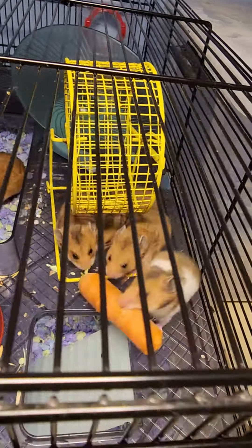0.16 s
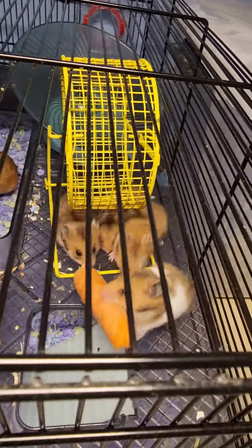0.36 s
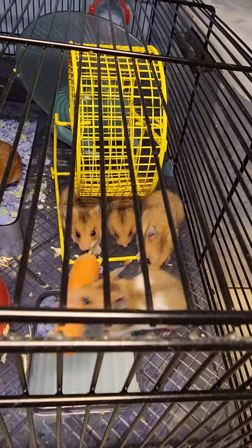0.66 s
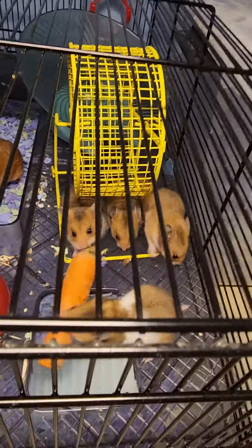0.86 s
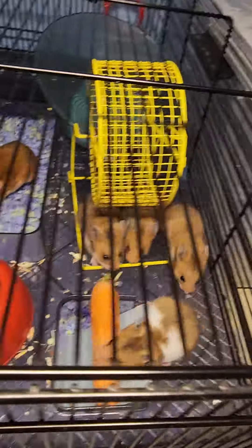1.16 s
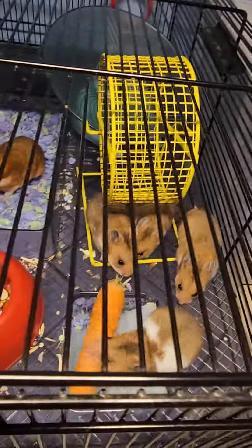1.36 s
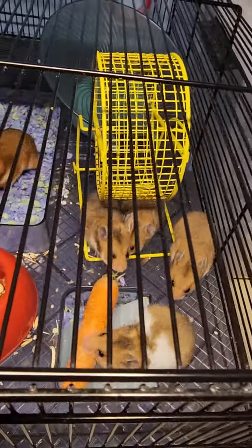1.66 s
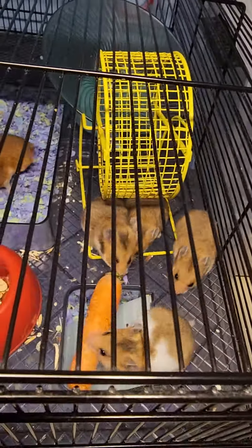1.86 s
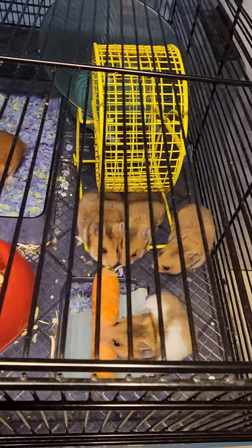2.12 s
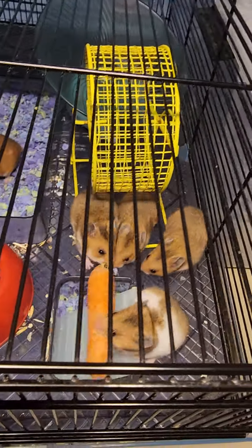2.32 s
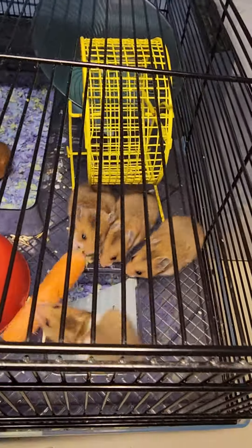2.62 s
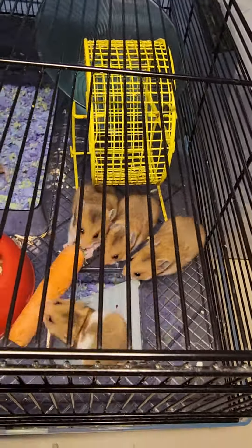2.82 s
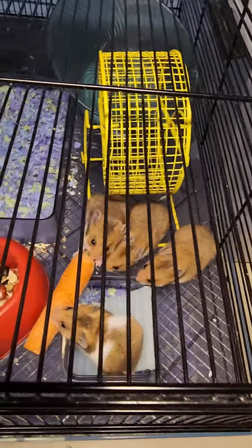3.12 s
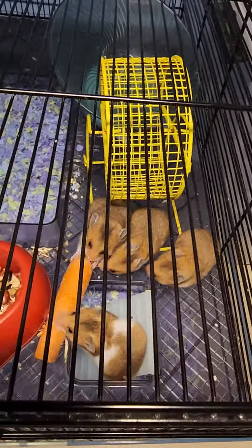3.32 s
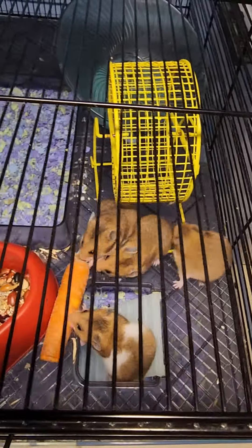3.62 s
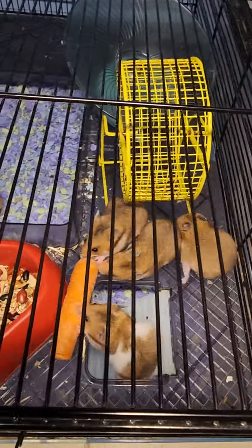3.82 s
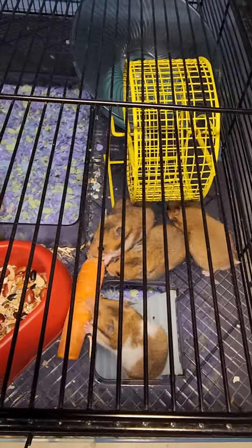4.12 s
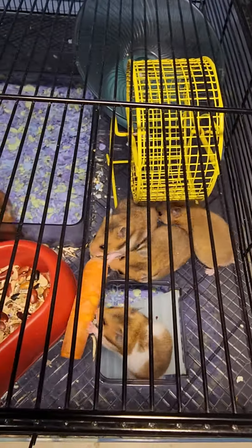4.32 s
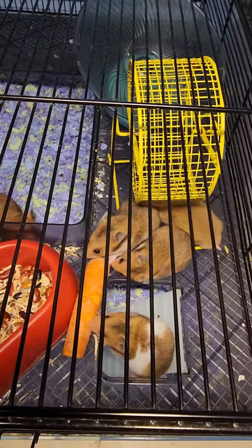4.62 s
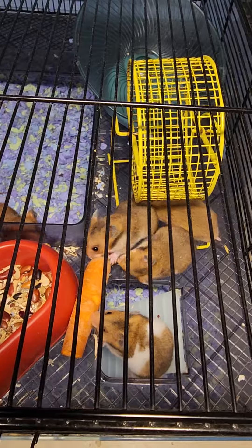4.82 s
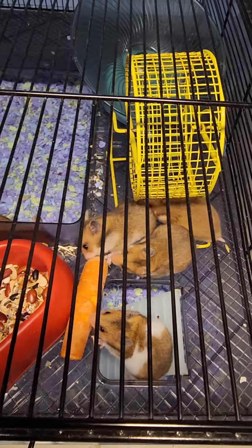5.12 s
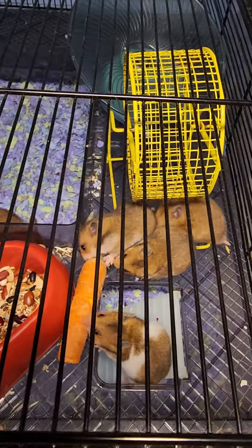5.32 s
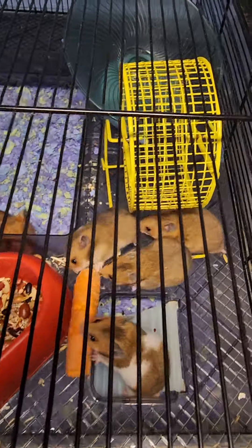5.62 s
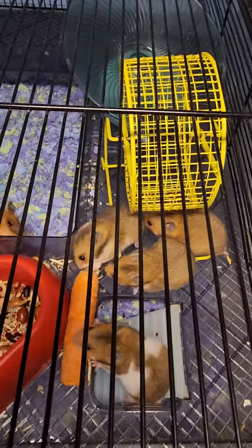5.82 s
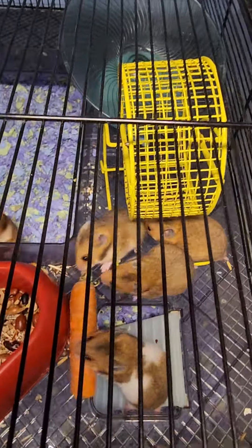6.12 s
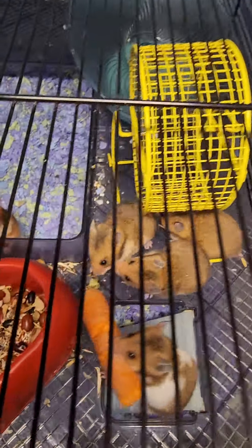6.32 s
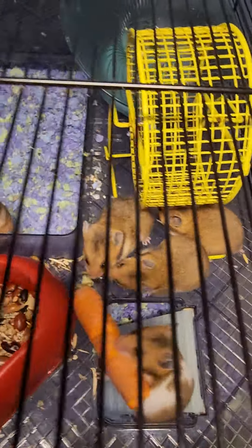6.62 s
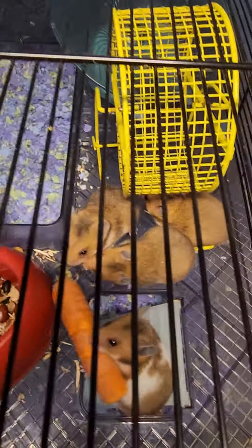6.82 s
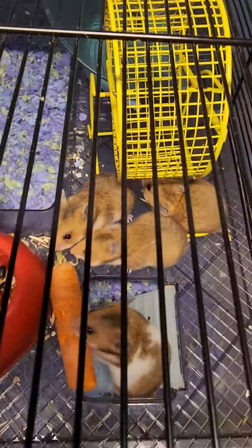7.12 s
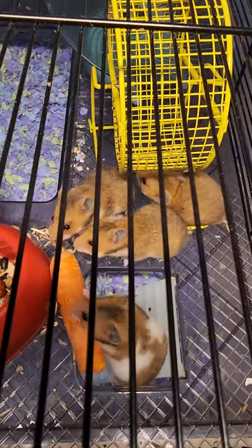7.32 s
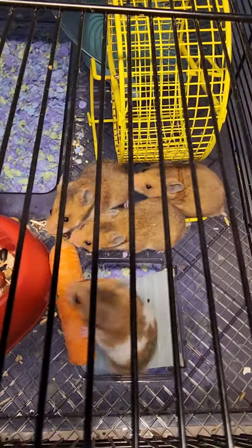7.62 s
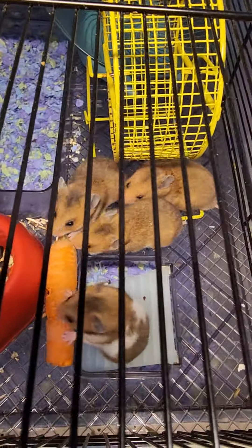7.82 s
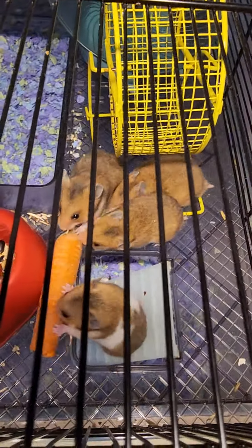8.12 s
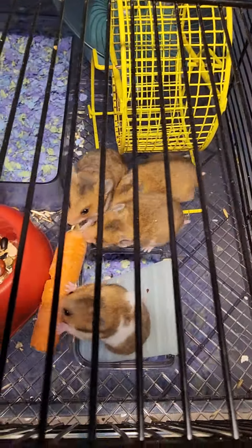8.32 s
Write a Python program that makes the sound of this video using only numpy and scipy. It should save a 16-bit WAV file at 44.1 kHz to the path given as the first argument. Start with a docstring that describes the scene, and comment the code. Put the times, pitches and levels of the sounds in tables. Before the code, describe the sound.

Close stereo pickup of hamsters in a wire cage with a plastic tray. Low room rumble and faint bar hum lead into ticks and soft bumps, a clattering burst around one second, then three raspy screeches. One very sharp knock rattles the wires, a lesser one follows, and quieter nudges, claw ticks and faint scrapes lead to a final cluster of knocks.

```python
"""A low room rumble and a faint hum of wire bars come first, then light ticks and soft bumps.
Hamsters squabble over a carrot in a wire cage with a plastic tray. Bumps strike the tray and rattle the wires
(ringing tones and bursts of noise), and the long bars hum on for seconds (slowly fading narrow noise).
Claws and teeth tick (short bright noise), the dragged carrot scrapes (stick-slip clicks), and one animal
screeches hoarsely three times (two shaky pitches plus rasping noise). Steady rumble and hiss lie below."""
import sys
import numpy as np
from scipy import signal
from scipy.io import wavfile

SR = 44100
rng = np.random.default_rng(int(sys.argv[2]) if len(sys.argv) > 2 else 0)


def generate_wav(signal):
    """Clip the signal to [-1, 1] and save it as 16-bit WAV at the path in sys.argv[1]."""
    frames = np.transpose(np.atleast_2d(signal))
    scaled = np.clip(frames, -1, 1) * 32767
    pcm = np.round(scaled).astype(np.int16)
    wavfile.write(sys.argv[1], SR, pcm)


N = 373086  # length in samples

# Bumps on tray and wires, each with a sharp clack and a dull thump: start_s, clack_db, thump_db
CAGE_BUMPS = [(0.229, -53.5, -55), (0.436, -54.5, -55), (0.693, -52, -36.5), (0.747, -50, -38.5),
              (0.754, -38, -34), (0.945, -42, -36), (0.968, -41, -34.5), (0.983, -36, -33.5),
              (1.001, -33.5, -29.5), (1.038, -37.5, -38.5), (1.054, -37, -31), (1.073, -43.5, -32.5),
              (1.864, -50, -56.5), (1.995, -63, -45.5), (2.523, -52.5, -42.5), (2.579, -24.5, -17),
              (2.585, -14.5, -26.5), (2.588, -18, -29), (3.18, -53.5, -37.5), (3.219, -62, -41),
              (3.5, -53, -34.5), (3.573, -27.5, -27.5), (3.6, -38, -29), (5.04, -59, -46),
              (5.237, -57, -44), (5.297, -45.5, -42), (5.38, -53, -49), (5.443, -48, -46),
              (5.631, -47, -36), (5.833, -51, -49), (6.157, -45, -41), (6.166, -42.5, -43),
              (6.293, -50, -48), (6.828, -57.5, -43), (6.861, -54, -51), (7.42, -43.5, -49),
              (7.598, -33.5, -29), (7.612, -30.5, -28.5), (7.642, -27.5, -31), (7.65, -34.5, -33.5),
              (7.673, -34.5, -39.5), (7.756, -45.5, -35.5), (7.78, -37, -37), (8.013, -47, -37.5),
              (8.103, -52, -39), (8.361, -62.5, -40.5)]
# Pitches at which the strength of a bump is set, from thump up to treble: pitch_hz
BUMP_REGISTERS_HZ = [300, 650, 1300, 2300, 6000]
# Ringing tones of the tray and wire frame: pitch_hz, level_db, fade_s (time to fall by 60 dB)
CAGE_MODES = [(123.1, -5, 0.57), (138, -2, 0.33), (195.7, 2, 0.49), (291.3, -6, 0.35), (476, 3, 0.065),
              (566, -15, 0.076), (665, -7.5, 0.11), (724, -19, 0.29), (774, -8.5, 0.15), (859.3, -3, 0.091),
              (900, -20.5, .3), (1080, -17.5, 0.12), (1089, -20, 0.1), (1303, -2.5, 0.061),
              (1575, -21.5, 0.24), (1620, -21, .1), (2091, -8.5, 0.14), (2380, -12.5, 0.093),
              (2697, -28, 0.2), (2890, -24, 0.25), (3091, -24.5, .3), (3550, -7, 0.2)]
# Dense ring of the many wires: pitch_hz, level_db (per third-octave band)
WIRE_RATTLE = [(60, -39.5), (90, -14), (130, -3.5), (190, -13.5), (260, -11.5), (650, -9), (1000, -14),
               (1350, -8), (2100, -21), (3000, -13.5), (6000, -6.5), (8000, -8), (11000, -18),
               (15000, -12.5)]
# How long that ring lasts: pitch_hz, fade_s (time to fall by 60 dB)
WIRE_RATTLE_FADE = [(100, 0.6), (400, 0.35), (1500, 0.3), (6000, 0.33), (14000, 0.033)]
# Long bars that hum on after a bump: pitch_hz, width_hz, level_db (against the thump), fade_s
LONG_BARS = [(292.8, 42, -34.5, 5), (342.7, 25, -40, 4.5), (394.8, 71, -32.5, 2), (805.6, 100, -43.5, 2.2)]
# Clicks of claws and teeth, and snaps of loose wires jolted by bumps: start_s, level_db
TICKS = [(0.1395, -67.5), (0.5633, -66.5), (0.965, -61), (1.036, -54.5), (1.351, -61.5), (2.5067, -70),
         (3.169, -64), (3.1752, -58.5), (3.499, -62.5), (3.5437, -62), (3.602, -51.5), (4.2293, -75),
         (5.658, -57), (7.2662, -64.5), (7.3062, -56), (7.4156, -58), (7.596, -46), (8.4223, -70)]
# Tone colour of the ticks: pitch_hz, level_db (per third-octave band)
TICK_COLOUR = [(1500, -14), (3500, -8), (5000, -12.5), (8000, 4.5), (10500, -18.5), (15000, -15)]
# Pulls of the carrot over the tray: start_s, length_s, level_db
CARROT_DRAGS = [(6.851, 0.051, -72.5), (6.971, 0.042, -74.5), (7.219, 0.06, -76.5)]
# Hoarse cries: start_s, length_s, level_db, low_pitch_start_hz, low_pitch_end_hz,
# then against that level: low_voice_db, shrill_overtone_db, rasp_db
CRIES = [(1.211, 0.099, -63, 907, 981, -4.5, 2, -10), (1.486, .355, -59, 1060, 1011, -4.5, -5, -7),
         (1.966, 0.38, -61, 905, 935, -3.5, -8.5, -19.5)]
# Overtones of the lower voice: multiple_of_pitch, level_db
LOW_VOICE = [(1, 4), (2, -9.5), (3, -8), (4, -10.5), (5, -10.5), (7, -33.5)]
# Overtones of the higher voice: multiple_of_pitch, level_db
HIGH_VOICE = [(1, -18), (2, 4), (4, -21.5), (6, -40)]
# Overtones of the squeak: multiple_of_pitch, level_db
SQUEAK_VOICE = [(1, 5.5), (2, 4.5), (3, -25), (4, -38), (6, -28)]
# Resonances of the hoarse high voice: pitch_hz, width_hz, level_db
GROWL = [(2010, 130, 1.5), (2190, 200, -2.5)]
# Resonances of the rasp in the throat: pitch_hz, width_hz, level_db
THROAT = [(2940, 490, -3.5), (3922, 510, -2), (4800, 240, -4), (5320, 370, -4), (6800, 1600, -14),
          (8200, 410, -16)]
# Spectrum shape of the low room rumble: pitch_hz, level_db (per Hz)
RUMBLE_COLOUR = [(20, -19.5), (33, -17.5), (45, 7.5), (60, -0.5), (85, 4), (120, -30.5), (200, -48)]
# Spectrum shape of the steady room tone and hiss: pitch_hz, level_db (per Hz)
ROOM_COLOUR = [(100, -3), (150, -9), (190, -5), (240, -13), (290, -8), (500, -18), (1000, -26), (2000, -31),
               (4000, -36), (6000, -37), (8200, -34), (9300, -49), (12500, -46), (16000, -47)]
# How alike the noise is in left and right: pitch_hz, likeness (0 to 1)
EAR_LIKENESS = [(100, .98), (300, 0.8), (650, 0.3), (1300, 0.086), (2200, .15), (5000, 0.17), (12000, 0)]

BAND_EDGES_HZ = 20 * 2 ** np.arange(0, 9.8, 1 / 3)  # third-octave steps
HARD_RISE_S, SOFT_RISE_S = 0.0008, 0.007  # time for a strike or a push to spread through the wires
JINGLE_DB = -27.5  # bright snap of loose wires, against a bump's clack
JINGLE_ABOVE_DB = -37  # bumps with a softer clack add no snap
FAINT_TICK_DB, STEP_DB = -67, -66  # upper settings for stray claw ticks and light steps
DRAG_PANEL_HZ, DRAG_PANEL_T60_S = 1350, 0.02  # tray panel under the carrot
CRY_ATTACK_S, CRY_RELEASE_T60_S = 0.03, 0.57
HIGH_PITCH_HZ, HIGH_SAG_HZ_PER_S = 1179, 55  # the second pitch starts alike in every cry and sinks
# In the second cry the low voice breaks upward into a clearer, falling squeak
SQUEAK_START_S, SQUEAK_LENGTH_S, SQUEAK_DB = 1.52, 0.08, -55
SQUEAK_HZ, SQUEAK_FALL_HZ_PER_S = 1360, 1330
RUMBLE_DB, RUMBLE_WANDER_DB, ROOM_TONE_DB = -55, -0.96, -66.5
CUTOFF_HZ = 15750


def bumps(bands, modes_db=-11.0, crack_db=1.5, tail_db=-8.5, scatter_db=3.5, treble_db=-25.0,
          grain_db=-0.5, panel_db=-1.0):
    """Each bump is a contact pulse, the cage's ringing tones, and a rattle that dies fast, then slowly."""
    starts, clack, thump = np.transpose(CAGE_BUMPS)
    # Loud bumps and those with little thump are clean strikes; fur cushions the rest, which drag a little
    hard = np.clip(np.maximum((clack + 48) / 24, (clack - thump) / 7), 0, 1)
    # Only a heavy thump leaves the whole cage rattling
    shaken = np.clip((thump + 55) / 22, 0.15, 1)
    soft = 1 - hard

    def blow_db(hz):
        """Hard contacts reach the wires' treble; soft ones mostly move the tray."""
        levels = zip(thump, clack, clack - 3 * soft, clack - 6 * soft, clack + treble_db)
        return np.array([np.interp(np.log(hz), np.log(BUMP_REGISTERS_HZ), row) for row in levels])

    def spread(power):
        """Energy enters the wires almost at once from a strike, slowly from a cushioned push."""
        strike = swelling(clicks(starts, power * hard), HARD_RISE_S)
        push = swelling(clicks(starts, power * soft), SOFT_RISE_S)
        return strike + push

    body = 0
    scatter = scatter_db * rng.standard_normal((len(starts), len(CAGE_MODES)))
    for k, (hz, db, t60) in enumerate(CAGE_MODES):
        strength = from_db(blow_db(hz) + db + modes_db + scatter[:, k])
        body = body + (-1) ** k * ring(clicks(starts, strength), hz, t60)

    # The plastic panel gives a few strong cycles, the upper ones only when hit hard
    upper_panel = ring(clicks(starts, hard ** 2 * from_db(clack + panel_db)), hz=1400, t60=0.018)
    lower_panel = ring(clicks(starts, from_db(clack - 2.5)), hz=745, t60=0.007)

    rattle = 0
    grain = rms_one(from_db(grain_db * drift(rate=30)))  # loose wires touch unevenly
    for hz, noise in bands:
        if hz <= 55:
            continue
        power = from_db(blow_db(hz) + at_hz(WIRE_RATTLE, hz)) ** 2
        treble_weight = hz / (hz + 600)
        crack = from_db(crack_db) ** 2 * dying(spread(power), t60=0.035) * treble_weight
        tail = from_db(tail_db) ** 2 * dying(spread(power * shaken), at_hz(WIRE_RATTLE_FADE, hz))
        rattle = rattle + noise * np.sqrt(crack + tail)
    return band(body + upper_panel + lower_panel, low_hz=50, high_hz=3900) + grain * rattle


def bar_hum(stirred_db=-35.5):
    """Many bars of nearly equal pitch store each thump and give it back slowly."""
    starts, _, thump = np.transpose(CAGE_BUMPS)
    # A push at time zero sets the bars stirring from the start
    power = from_db(np.append(stirred_db, thump)) ** 2
    energy = swelling(clicks(np.append(0, starts), power), rise_s=0.016)
    hum = 0
    for hz, width, db, t60 in LONG_BARS:
        hum = hum + from_db(db) * np.sqrt(dying(energy, t60)) * air(hz - width / 2, hz + width / 2)
    return hum


def ticks(bands, snap_t60=0.017, tail_db=-13.5, tail_t60=0.17, spread_db=20.0):
    """Claws, teeth and jolted wires give short bright snaps of noise, with fainter ones at random."""
    jingles = [(start, clack + JINGLE_DB) for start, clack, _ in CAGE_BUMPS if clack > JINGLE_ABOVE_DB]
    starts, db = np.transpose(list(TICKS) + jingles)
    faint_starts = rng.random(size=70) * N / SR
    faint_db = FAINT_TICK_DB - spread_db * rng.random(len(faint_starts))
    energy = clicks(starts, from_db(db) ** 2) + clicks(faint_starts, from_db(faint_db) ** 2)
    energy = swelling(energy, rise_s=0.00061)
    snap = dying(energy, snap_t60)
    tail = from_db(tail_db) ** 2 * dying(energy, tail_t60)
    bright_noise = sum(noise * from_db(at_hz(TICK_COLOUR, hz)) for hz, noise in bands if hz > 1300)
    return np.sqrt(snap + tail) * bright_noise


def paws(spread_db=18.0):
    """Light steps at random times keep the cage's low tones ringing faintly."""
    starts = rng.random(size=90) * N / SR
    weight = from_db(STEP_DB - spread_db * rng.random(len(starts)))
    low_modes = [mode for mode in CAGE_MODES if mode[0] < 1000]
    steps = 0
    for k, (hz, db, t60) in enumerate(low_modes):
        pushes = clicks(starts, weight * rng.standard_normal(len(starts)))
        steps = steps + (-1) ** k * from_db(db) * ring(pushes, hz, t60)
    return steps


def scrape(slips_per_s=220):
    """The dragged carrot sticks and slips, ringing one panel of the tray."""
    slips = (rng.random(N) < slips_per_s / SR) * rng.standard_normal(N)
    pull = sum(from_db(db) * envelope(start, length, attack_s=0.029, release_t60=0.13)
               for start, length, db in CARROT_DRAGS)
    panel = rms_one(ring(slips, DRAG_PANEL_HZ, DRAG_PANEL_T60_S))
    return room(pull * panel, t60=0.17, wet_db=1.5)


def screech(growl_db=-2.0, squeak_share=0.97):
    """Two hoarse pitches sound at once over a throat rasp; in one cry they give way to a clearer squeak."""
    low_hz, high_hz, high, low, shrill, rasp = cry_controls()
    broken = envelope(SQUEAK_START_S, SQUEAK_LENGTH_S, attack_s=0.052, release_t60=0.09)
    # The high voice gives way to the squeak too
    remaining = 1 - np.clip(squeak_share, 0, 1) * broken
    high, shrill = remaining * high, remaining * shrill

    high_phase = shaky_phase(high_hz, jitter=0.022)
    low_cry = low * (1 - broken) * voice(shaky_phase(low_hz, jitter=0.027), LOW_VOICE, flutter_db=4.0)
    high_cry = high * voice(high_phase, HIGH_VOICE, flutter_db=6.0)
    overtone = shrill * np.sqrt(2) * np.sin(3 * high_phase)
    hoarse = high * from_db(growl_db) * resonances(GROWL) + rasp * resonances(THROAT)
    hoarse = hoarse * rms_one(from_db(3.0 * drift(rate=300)))

    since_break_s = np.clip(np.arange(N) / SR - SQUEAK_START_S, 0, SQUEAK_LENGTH_S)
    squeak_phase = shaky_phase(SQUEAK_HZ - SQUEAK_FALL_HZ_PER_S * since_break_s, jitter=0.009)
    squeak = from_db(SQUEAK_DB) * broken * voice(squeak_phase, SQUEAK_VOICE, flutter_db=1.0)
    return room(low_cry + high_cry + overtone + hoarse + squeak, t60=0.18, wet_db=3.0)


def cry_controls():
    """Both pitches glide through each cry; one envelope drives high voice, low voice, overtone and rasp."""
    pitches, gains = [], 0
    for start, length, db, from_hz, to_hz, *parts_db in CRIES:
        pitches.append((start, from_hz, HIGH_PITCH_HZ))
        pitches.append((start + length, to_hz, HIGH_PITCH_HZ - HIGH_SAG_HZ_PER_S * length))
        part_gains = from_db(db + np.array([0, *parts_db]))
        gains = gains + np.outer(part_gains, envelope(start, length, CRY_ATTACK_S, CRY_RELEASE_T60_S))
    times, low_hz, high_hz = np.transpose(pitches)
    t = np.arange(N) / SR
    return np.interp(t, times, low_hz), np.interp(t, times, high_hz), *gains


def voice(phase, partials, flutter_db):
    """A pitch with its overtones, whose strength shakes irregularly."""
    tone = sum(from_db(db) * np.sqrt(2) * np.sin(k * phase) for k, db in partials)
    return rms_one(from_db(flutter_db * drift(rate=170))) * tone


def shaky_phase(pitch_hz, jitter):
    """A strained voice cannot hold its pitch."""
    return 2 * np.pi * np.cumsum(pitch_hz * (1 + jitter * drift(rate=64))) / SR


def resonances(table):
    """Noise ringing in a few narrow bands."""
    return sum(from_db(db) * rms_one(band(rng.standard_normal(N), hz - width / 2, hz + width / 2))
               for hz, width, db in table)


def background(bands):
    """Room rumble that wanders a little in level, over steady room tone and hiss."""
    rumble_level = from_db(RUMBLE_DB + RUMBLE_WANDER_DB * drift(rate=1.3))
    rumble = rumble_level * coloured(bands, RUMBLE_COLOUR)
    return rumble + from_db(ROOM_TONE_DB) * coloured(bands, ROOM_COLOUR)


def coloured(bands, spectrum):
    """Steady noise of a given spectrum, at rms 1."""
    lowest, highest = spectrum[0][0], spectrum[-1][0]
    # The root of the pitch turns a level per Hz into a level per band
    return rms_one(sum(noise * np.sqrt(hz) * from_db(at_hz(spectrum, hz))
                       for hz, noise in bands if lowest <= hz <= highest))


def noise_bands():
    """Third-octave bands of diffuse noise: (centre Hz, stereo noise)."""
    return [(np.sqrt(low * high), air(low, high)) for low, high in zip(BAND_EDGES_HZ, BAND_EDGES_HZ[1:])]


def air(low_hz, high_hz):
    """A band of diffuse stereo noise, most alike in both ears in the bass, at rms 1."""
    mid, side = band(rng.standard_normal((2, N)), low_hz, high_hz)
    alike = np.clip(at_hz(EAR_LIKENESS, np.sqrt(low_hz * high_hz)), -1, 1)
    return rms_one(np.sqrt(1 + alike) * mid + np.sqrt(1 - alike) * np.array([side, -side]))


def room(x, t60, wet_db):
    """Direct sound plus dense reflections that differ in each ear."""
    t = np.arange(int(t60 * SR)) / SR
    tail = rng.standard_normal((2, len(t))) * from_db(-60 * t / t60)
    tail = tail / np.sqrt(np.sum(tail ** 2, axis=1, keepdims=True))
    wet = from_db(wet_db)
    reflections = signal.fftconvolve(x[None], tail, axes=1)[:, :N]
    return (x + wet * reflections) / np.sqrt(1 + wet ** 2)


def clicks(times, sizes):
    """One impulse at each time."""
    out = np.zeros(N)
    np.add.at(out, np.clip(np.round(times * SR).astype(int), 0, N - 1), sizes)
    return out + 1e-18  # tiny offset keeps the filters away from zero


def ring(x, hz, t60):
    """A unit click sets a fading sine of starting height 1 ringing."""
    r = from_db(-60 / (t60 * SR))
    w = 2 * np.pi * hz / SR
    return signal.lfilter([0, np.sin(w)], [1, -2 * r * np.cos(w), r * r], x)


def swelling(energy, rise_s):
    """A blow takes a moment to spread."""
    r = np.exp(-1 / (rise_s * SR))
    return signal.lfilter([1 - r], [1, -r], energy)


def dying(energy, t60):
    """Energy put in by blows leaks away, falling by 60 dB in t60 seconds."""
    return signal.lfilter([1], [1, -from_db(-120 / (t60 * SR))], energy)


def envelope(start, length, attack_s, release_t60):
    """Rise, hold to the end of the length, die away."""
    t = np.arange(N) / SR - start
    fade = from_db(-60 * np.clip((t - length) / release_t60, 0, 3))
    return np.clip(t / attack_s, 0, 1) * fade


def drift(rate):
    """Smooth random wander of spread 1; a higher rate in Hz wanders faster."""
    # Made at one value per 20 samples; the first 3000 values let the filter settle
    r = np.exp(-40 * np.pi * rate / SR)
    slow = signal.lfilter([1], [1, -2 * r, r * r], rng.standard_normal(N // 20 + 3002))[3000:]
    return np.interp(np.arange(N) / 20, np.arange(len(slow)), rms_one(slow))


def band(x, low_hz, high_hz):
    """Keep only the pitches between two limits."""
    limits = [max(low_hz, 10), min(high_hz, 0.45 * SR)]
    return signal.sosfilt(signal.butter(2, limits, "band", fs=SR, output="sos"), x)


def at_hz(points, hz):
    """Read a table at one pitch, with even steps per octave."""
    table = np.array(points)
    return np.interp(np.log(hz), np.log(table[:, 0]), table[:, 1])


def from_db(db):
    """Decibels to gain."""
    return 10 ** (np.asarray(db) / 20)


def rms_one(x):
    """Scale to an rms of 1."""
    return x / np.sqrt(np.mean(x ** 2) + 1e-20)


def scene():
    """The cage sits slightly to the left, over the room background."""
    bands = noise_bands()
    cage = bumps(bands) + bar_hum() + ticks(bands) + paws() + scrape() + screech()
    pan_db = 0.94  # left louder than right by this much
    panned = cage * from_db([[pan_db / 2], [-pan_db / 2]])
    swapped_bands = [(hz, noise[:, ::-1]) for hz, noise in bands]  # same noise, reversed in time
    return panned + background(swapped_bands)


def record(dry):
    """The top of the treble is cut steeply."""
    return signal.sosfilt(signal.ellip(10, 0.1, 80, CUTOFF_HZ, fs=SR, output="sos"), dry)


dry = scene()
out = record(dry)
generate_wav(out)
```